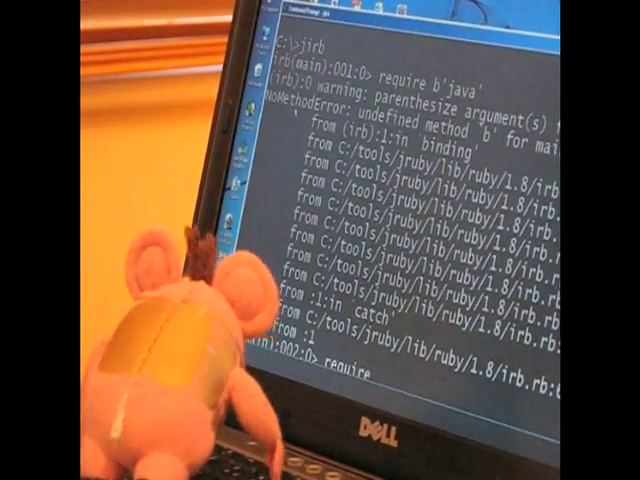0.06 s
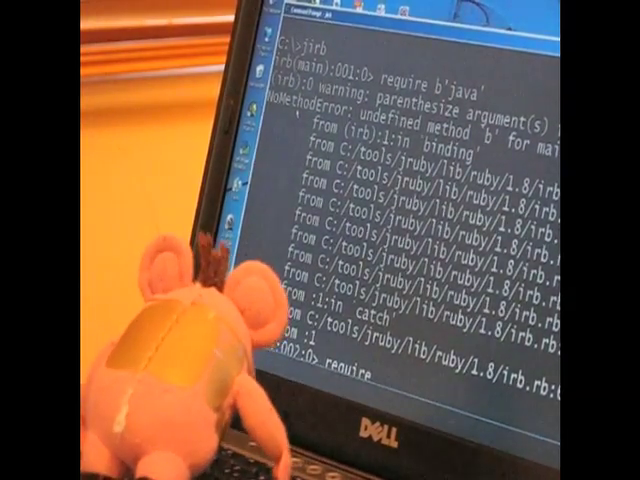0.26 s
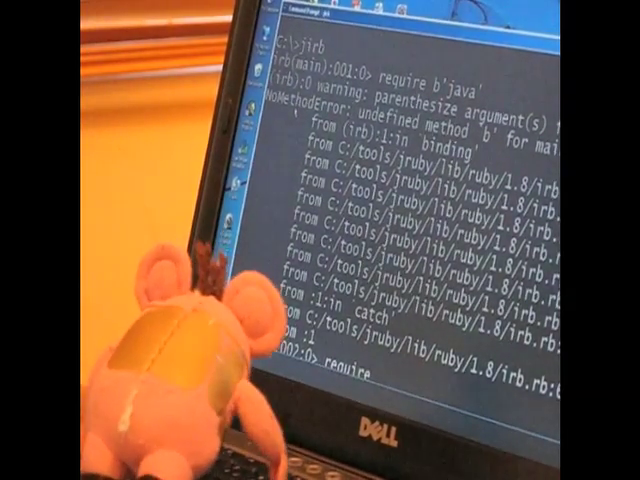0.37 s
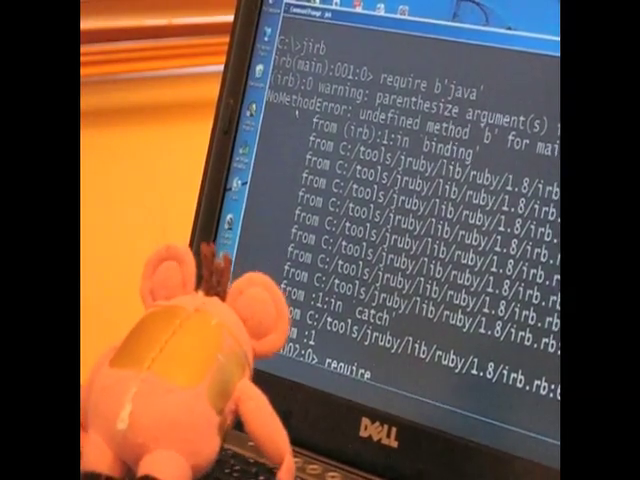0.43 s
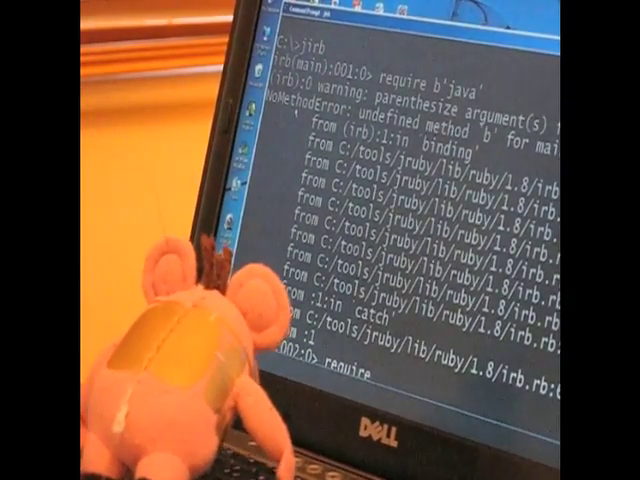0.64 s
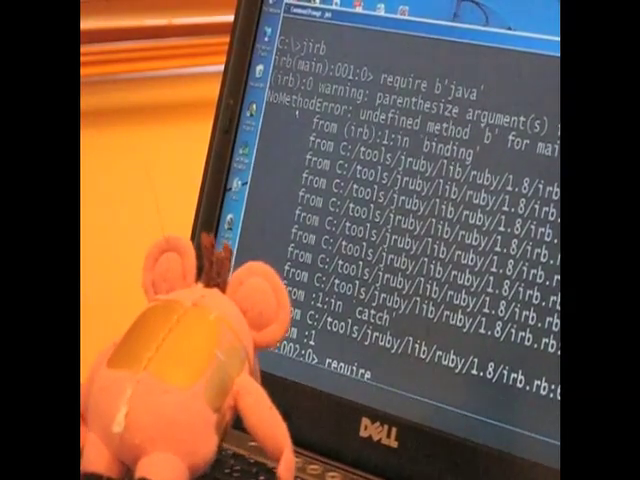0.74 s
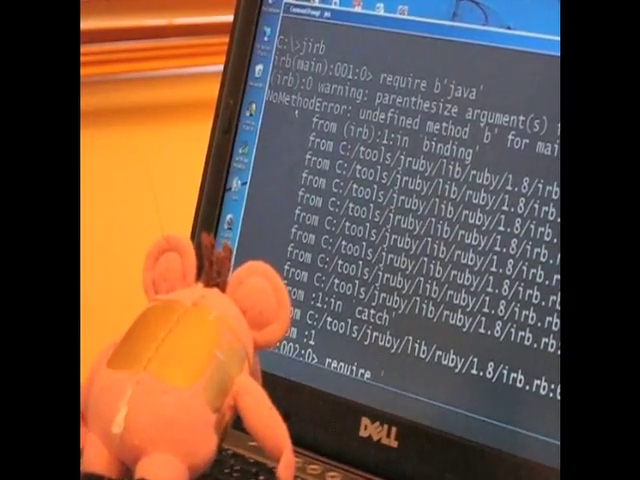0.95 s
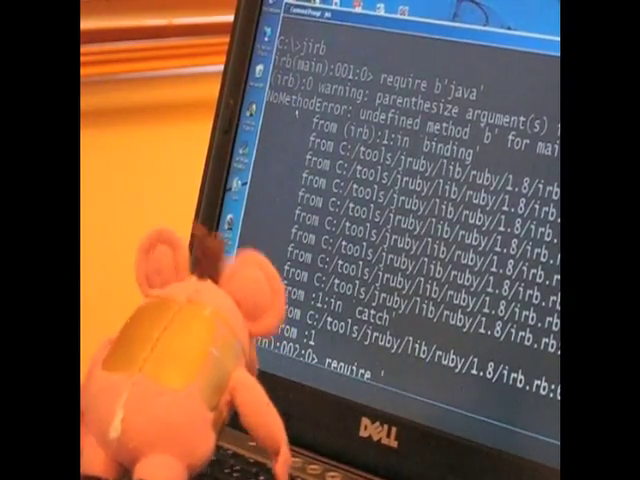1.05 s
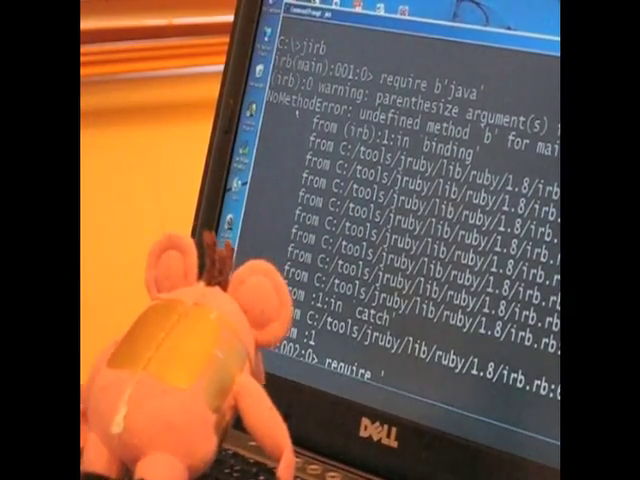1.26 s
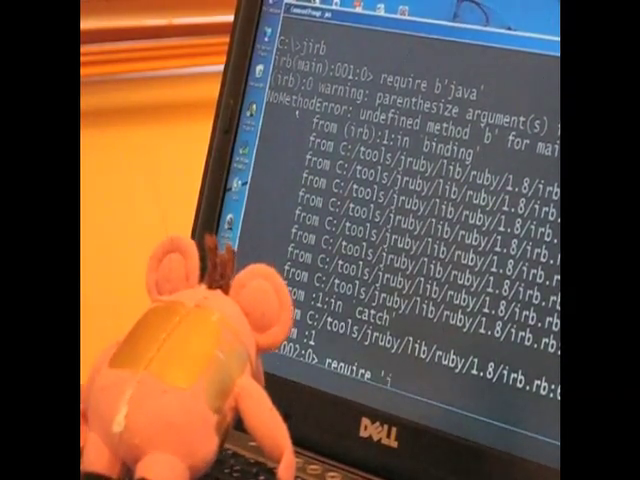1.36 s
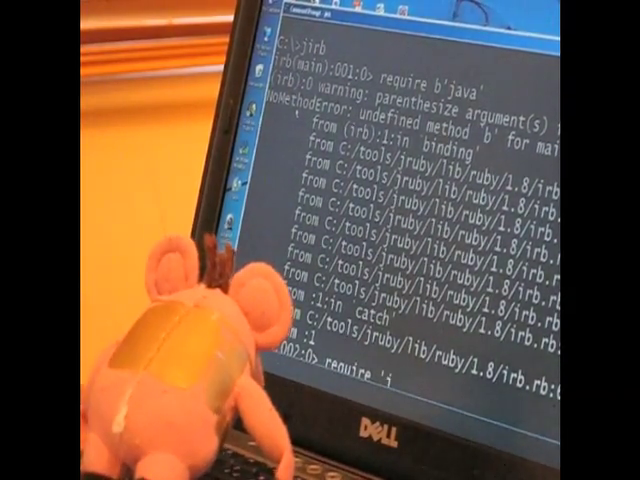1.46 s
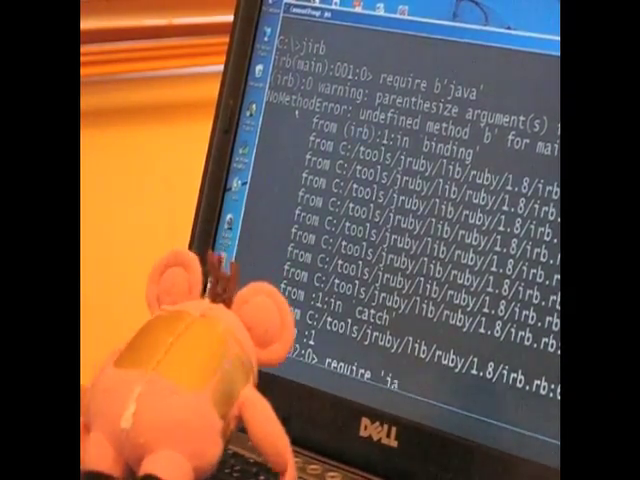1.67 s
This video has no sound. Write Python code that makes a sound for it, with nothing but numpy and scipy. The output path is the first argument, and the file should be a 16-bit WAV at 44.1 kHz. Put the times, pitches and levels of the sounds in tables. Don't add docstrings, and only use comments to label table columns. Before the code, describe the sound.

Slow, uneven typing on a laptop keyboard, separate clacks over faint steady hiss

```python
import sys
import numpy as np
from scipy import signal
from scipy.fft import rfft, irfft
from scipy.io import wavfile
from scipy.ndimage import uniform_filter1d

SR = 44100
rng = np.random.default_rng(int(sys.argv[2]) if len(sys.argv) > 2 else 0)


def volts_from_decibels(level):
    exponent = np.asarray(level, float) / 20
    return 10 ** exponent


def master(y):
    cut = np.clip(np.atleast_2d(y).T, -1, 1)
    pcm = np.round(cut * 32767)
    wavfile.write(sys.argv[1], SR, pcm.astype(np.int16))


N = 74970
LEAD = 8820
TOTAL = N + LEAD
LEAST_WIDTH_HZ = 200

# (frequency [Hz], width [Hz], level [dB])
EARLY_CAP = [(1130, 510, -2), (2520, 700, -39), (3470, 170, 1), (7600, 140, 15), (8600, 380, 5),
             (10200, 180, 14), (12600, 220, -3)]
EARLY_BACK = [(516, 190, -17), (1880, 370, 3.5), (2680, 210, -26), (4170, 440, 6), (10700, 90, 2.5),
              (12800, 98, 0)]
WIDE_SNAP = [(1860, 240, -32), (2460, 300, 3), (5390, 530, 5), (9700, 250, -14), (10700, 250, -5.5),
             (15000, 440, -1)]
WIDE_LAND = [(830, 120, -7.5), (1824, 100, 7), (2570, 610, -1.5), (5630, 510, 4.5), (6700, 180, -4.5),
             (8180, 190, -0.5), (9170, 550, -0.5), (10500, 1000, 6), (12200, 370, -34)]
WIDE_BACK = [(1230, 420, 0.5), (1770, 300, 8.5), (2880, 270, 3.5), (4980, 480, 4), (6540, 240, -1),
             (8700, 500, -21), (10700, 340, -1), (11600, 190, 3), (12900, 430, -5)]
WIDE_RATTLE = [(1780, 106, 7.5), (2600, 560, 2), (5560, 400, 7.5), (8960, 180, 6), (10400, 600, -4),
               (12800, 570, 5.5)]
MID_SNAP = [(1180, 120, 4.5), (2350, 170, 8), (3170, 640, 15), (4620, 460, 11), (6650, 240, -29),
            (8030, 330, 17), (10900, 270, -22)]
MID_LAND = [(686, 190, 2), (2800, 190, 1), (3320, 190, -22), (4360, 500, 21), (5700, 740, 13.5),
            (7070, 560, 8.5), (7800, 400, 8), (8900, 280, 11), (11100, 360, -30)]
SMALL_SNAP = [(960, 360, 2), (1880, 170, 3), (2950, 960, 13), (6800, 670, -29), (10500, 190, -27),
              (12000, 280, -27)]
SMALL_LAND = [(1830, 96, -6), (2860, 240, 6.5), (3570, 130, 2), (4460, 390, -1), (5350, 850, 4),
              (6220, 360, 2.5), (7340, 710, -3), (8200, 600, 1), (9140, 320, -1), (10300, 210, -21),
              (11600, 220, -46)]
SMALL_BACK = [(1820, 330, -1), (2630, 310, -4.5), (4650, 180, -9), (7630, 75, -25), (9100, 260, -16),
              (9600, 170, -31)]
SMALL_SETTLE = [(3220, 110, -9), (3660, 120, -12), (5600, 110, -9.5), (8060, 260, -14)]
SOFT_SNAP = [(810, 91, -9), (4230, 500, 11.5), (5000, 400, -4), (7000, 160, -18), (9140, 260, -2.5),
             (10600, 86, -32)]
SOFT_LAND = [(820, 420, -4), (2350, 600, 6), (3200, 400, 4.5), (3870, 500, 8), (5100, 650, 0),
             (7800, 210, -1), (8300, 180, -10)]
# (resonances, rows of (time [s], level [dB], rise [s],
# fall [s], bare crack [dB]))
CONTACTS = [ (EARLY_CAP, [(-0.041, -27.5, 0.00111, 0.0077, -2.5)]),
            (EARLY_BACK, [(0.073, -40.5, 0.0018, 0.0025, -6)]),
            (WIDE_SNAP, [(0.2010, -31, 0.0018, 0.00045, -1.5), (0.2025, -23.5, 0.0018, 0.00017, -44)]),
            (WIDE_LAND, [(0.2088, -26.5, 0.0018, 0.00038, -7), (0.2098, -20, 0.00032, 0.00109, -4.5),
            (0.2135, -23.5, 0.0018, 0.0011, -12)]), (WIDE_BACK, [(0.3008, -21, 0.00009, 0.00035, -4.5)]),
            (WIDE_RATTLE, [(0.3045, -23.5, 0.0011, 0.0012, -6), (0.3070, -28.5, 0.00095, 0.0012, 0),
            (0.3105, -42, 0.0012, .0015, -13)]), (MID_SNAP, [(0.9428, -44, 0.00089, 0.00031, -6),
            (0.9443, -25.5, 0.0014, 0.001, -8.5)]), (MID_LAND, [(0.9506, -24.5, 0.000096, 0.00064, -2.5),
            (0.9640, -36.5, 0.0011, .0015, -12)]), (SMALL_SNAP, [(1.3603, -34.5, 0.0009, 0.0012, -3)]),
            (SMALL_LAND, [(1.3675, -25, 0.0001, 0.00056, -5)]),
            (SMALL_BACK, [(1.4765, -40, 0.0035, 0.00066, -5)]),
            (SMALL_SETTLE, [(1.5075, -43, 0.00063, 0.00069, -7)]),
            (SOFT_SNAP, [(1.6478, -36, 0.00023, 0.0009, -20), (1.6556, -56, 0.00022, 0.00043, -24)]),
            (SOFT_LAND, [(1.6672, -38, 0.002, 0.0039, -9.5)]), ]
# (time [s], level [dB], frequency [Hz], width [Hz], share sent to walls [dB])
KNOCKS = [
    (0.2095, -20, 789, 128, -17),
    (0.302, -33.5, 312, 36.5, -5.5),
    (0.302, -38.5, 510, 70, -21),
    (0.303, -31, 826, 70, -10),
    (0.950, -33, 494, 61, -5),
    (0.9505, -28, 746, 120, -7),
    (0.972, -33, 814, 30, -5.5),
    (0.958, -40, 685, 50, -11),
    (1.368, -56, 158, 50.7, -3),
]
# (frequency [Hz], level [dB])
CRACK_SPECTRUM = [(30, -43), (150, -26.5), (600, 0), (2000, 6.5), (9000, 5.5), (13000, -3.5), (16000, -9)]
# (time [s], length [s], frequency [Hz], width [Hz], level [dB])
SLEEVE = (1.19, .022, 12000, 3500, -62)
# (frequency [Hz], gain [dB])
LID_SHADE = [(150, 6), (300, 6.5), (3000, -3.5), (7000, -4), (10000, -8.5), (12500, -11), (16000, -28)]
# (frequency [Hz], gain [dB])
WALL_SPREAD = [(150, 13.5), (800, -3), (1600, -3.5), (5000, -5.5), (9000, -5.5), (13000, -1), (16000, -9)]
# (delay [s], level [dB])
ECHOES = [(.0021, -20), (.0046, -19), (.0128, -18), (.0165, -19), (.023, -19)]
# (frequency [Hz], T60 [s])
ROOM_T60 = [(200, 0.26), (500, 0.59), (1500, 0.37), (3000, 0.4), (6000, 0.38), (10000, 0.35), (15000, 0.19)]
# (frequency [Hz], density [dB per Hz])
HISS_SPECTRUM = [(30, -10.5), (150, -3), (500, -4), (1200, -5), (3000, -10.5), (6500, -17), (11000, -19.5),
                 (15600, -26.5)]
# (frequency [Hz], level [dB])
WHINE = [(14223, -77)]
# (frequency [Hz], gain [dB])
BAND_EDGE = [(15750, 0), (16000, -30), (16700, -36)]


def contact(body, time_s, level_db, rise_s, fall_s, crack_db):
    size = 2048
    t = np.arange(size) / SR - 0.01
    shape = np.where(t < 0, np.exp(-(t / rise_s) ** 2), np.exp(-t / fall_s))
    force = rng.standard_normal(size) * shape
    for _ in range(12):
        spectrum = rfft(force)
        flat = irfft(spectrum / abs(spectrum), size)
        force = flat * np.minimum(4 * shape, 1)
    crack = volts_from_decibels(crack_db) * evened(colour(force, CRACK_SPECTRUM))
    parts = np.array([ring(force, body), off_axis_ring(force, body), crack])
    return time_s + t[0], volts_from_decibels(level_db) * parts * np.sqrt(0.004 * SR / size)


def ring(force, body):
    total = np.zeros(len(force))
    for hz, width_hz, db in body:
        width_hz = 1.5 * max(width_hz, LEAST_WIDTH_HZ)
        once = resonate(force, hz, width_hz)
        total += volts_from_decibels(db) * resonate(once, hz, width_hz) / np.sqrt(width_hz)
    return evened(total)


def off_axis_ring(force, body):
    total = np.zeros(len(force))
    for k, (hz, width_hz, db) in enumerate(body):
        width_hz = max(width_hz, LEAST_WIDTH_HZ) + 0.07 * hz
        total += (-1) ** k * volts_from_decibels(db) * resonate(force, hz, width_hz) / np.sqrt(width_hz)
    return evened(total)


def knock(time_s, level_db, hz, width_hz, wall_db):
    t = np.arange(6000) / SR
    swell = 1 - np.exp(-(t * hz) ** 2)
    mode = swell * np.exp(-np.pi * width_hz * t) * np.sin(2 * np.pi * hz * t)
    return time_s, volts_from_decibels([[level_db], [level_db + wall_db]]) * mode


def sleeve_brush(time_s, length_s, hz, width_hz, level_db):
    t = np.arange(TOTAL) / SR - LEAD / SR - time_s
    swish = evened(resonate(rng.standard_normal(TOTAL), hz, width_hz))
    return volts_from_decibels(level_db) * swish * np.exp(-(t / length_s) ** 2)


def room(x):
    tail_db, rise_s, turn_s = -0.5, 0.0042, 0.2206
    time_s = np.arange(TOTAL) / SR
    out = np.zeros(TOTAL)
    for delay_s, db in ECHOES:
        delay = round(delay_s * SR)
        out[delay:] += volts_from_decibels(db) * x[:TOTAL - delay]
    for k in range(3):
        tail = room_tail(rise_s)
        share = np.sqrt(2 / 3) * np.cos(np.pi * (time_s / turn_s + k / 3))
        out += volts_from_decibels(tail_db) * signal.fftconvolve(x * share, tail)[:TOTAL]
    return out


def room_tail(rise_s):
    taps = np.zeros(SR // 2)
    at = np.arange(0, len(taps) - 12, 12)
    taps[at + rng.integers(0, 12, len(at))] = rng.choice([-1., 1.], len(at))
    hz, t, z = signal.stft(taps, SR, nperseg=256)
    decay_db = -60 * t / read(ROOM_T60, hz)[:, None]
    tail = signal.istft(z * volts_from_decibels(decay_db), SR, nperseg=256)[1]
    tail = tail * (1 - np.exp(-(np.arange(len(tail)) / SR / rise_s) ** 2))
    return tail / np.linalg.norm(tail)


def hiss():
    level_db, patch_db, swell_db = -54, 0.8, 0.3
    frames, hz = N // 256 + 5, np.fft.rfftfreq(1024, 1 / SR)
    real, imag, patches = rng.standard_normal((frames, 513, 3)).T
    patches = uniform_filter1d(patches, 12, 0)
    patches = evened(uniform_filter1d(patches, 14, 1))
    swell = evened(uniform_filter1d(rng.standard_normal(frames), 30))
    spectrum_db = read(HISS_SPECTRUM, hz)[:, None] + patch_db * patches + swell_db * swell
    z = (real + 1j * imag) * volts_from_decibels(spectrum_db)
    air = signal.istft(z, nperseg=1024, noverlap=768)[1][:N]
    return volts_from_decibels(level_db) * evened(air)


def whine():
    skirt_width_hz, skirt_db = 200, 2
    hz, db = WHINE[0]
    skirt = evened(resonate(rng.standard_normal(N), hz + 60, skirt_width_hz))
    tone = np.sqrt(2) * np.sin(2 * np.pi * hz * np.arange(N) / SR)
    return volts_from_decibels(db) * (tone + volts_from_decibels(skirt_db) * skirt)


def evened(x):
    return x / np.sqrt(np.mean(x ** 2) + 1e-20)


def read(points, hz):
    f, value = np.transpose(points)
    return np.interp(np.log(hz + 1), np.log(f + 1), value)


def resonate(x, hz, width_hz):
    r, w = np.exp(-np.pi * width_hz / SR), 2 * np.pi * hz / SR
    return signal.lfilter([(1 - r * r) / 2, 0, -(1 - r * r) / 2], [1, -2 * r * np.cos(w), r * r], x)


def colour(x, points):
    gain_db = read(points, np.fft.rfftfreq(len(x), 1 / SR))
    return irfft(rfft(x) * volts_from_decibels(gain_db), len(x))


def add(mix, time_s, sound):
    part = mix[..., LEAD + round(time_s * SR):][..., :sound.shape[-1]]
    part += sound[..., :part.shape[-1]]


def scene():
    crack_direct_db, crack_room_db = 1.5, 2
    wall_delay_s, wall_db = 0.0077, -9.5
    keys = np.zeros((3, TOTAL))
    for body, rows in CONTACTS:
        for row in rows:
            add(keys, *contact(body, *row))
    on_axis, off_axis, crack = keys
    room_crack = volts_from_decibels(crack_room_db) * crack
    caps = on_axis + room_crack
    for row in KNOCKS:
        add(keys[:2], *knock(*row))
    direct = colour(on_axis + volts_from_decibels(crack_direct_db) * crack, LID_SHADE)
    bounce = volts_from_decibels(wall_db) * np.roll(colour(caps, WALL_SPREAD), round(wall_delay_s * SR))
    reverb = room(colour(off_axis + room_crack, WALL_SPREAD))
    foreground = direct + sleeve_brush(*SLEEVE) + bounce + reverb
    return (foreground[LEAD:] + hiss() + whine())[None]


def band_limit(x):
    return signal.sosfilt(signal.butter(12, 16660, fs=SR, output="sos"), x)


def record(dry):
    mix = colour(dry[0], BAND_EDGE)[None]
    return band_limit(mix)


dry = scene()
out = record(dry)
master(out)
```